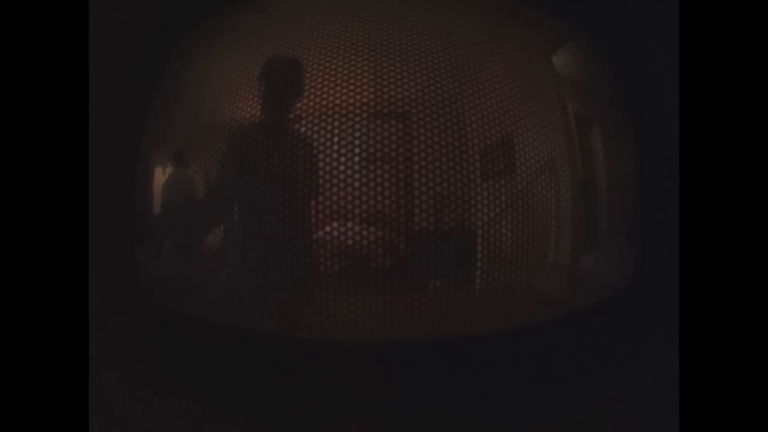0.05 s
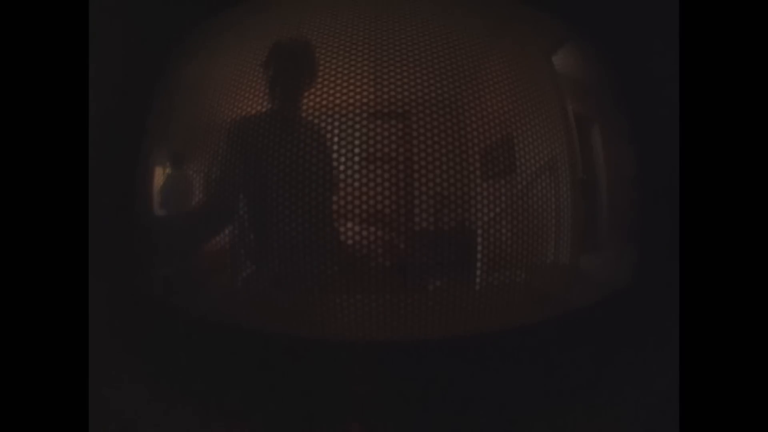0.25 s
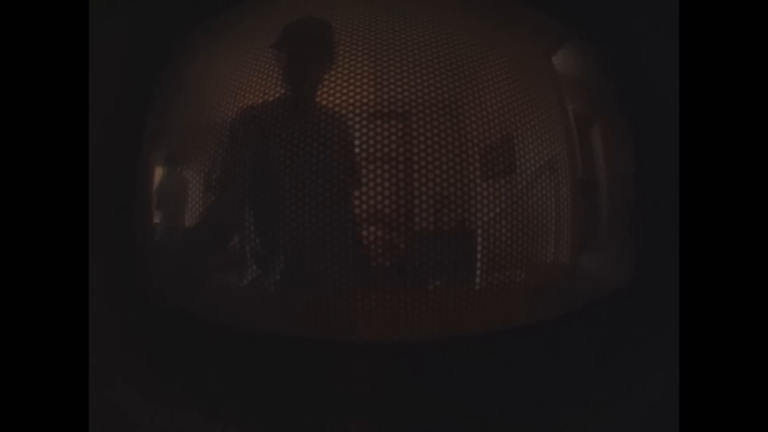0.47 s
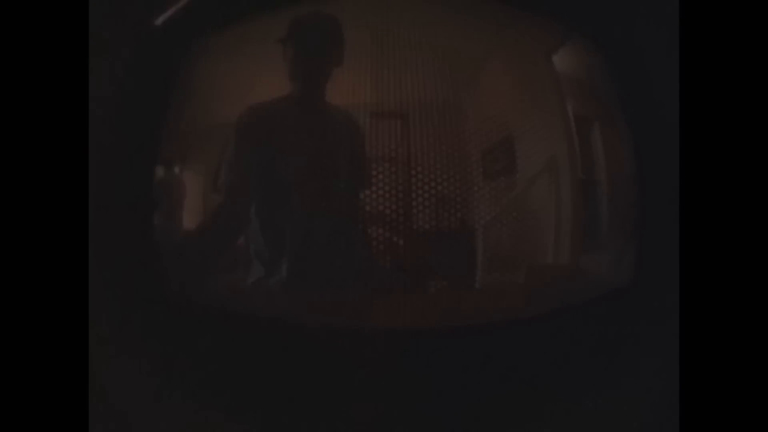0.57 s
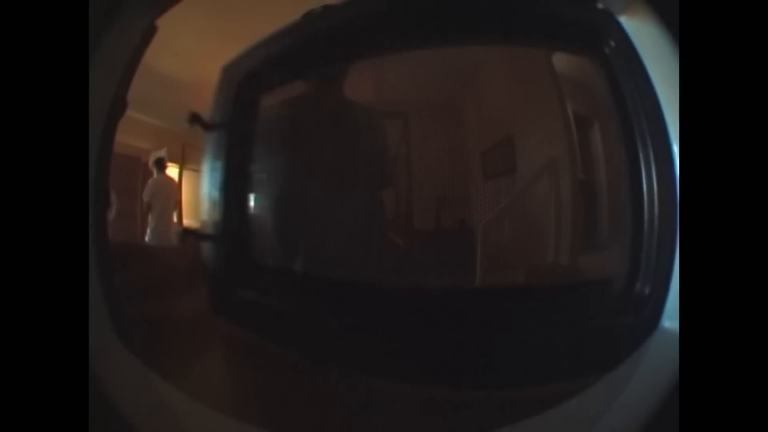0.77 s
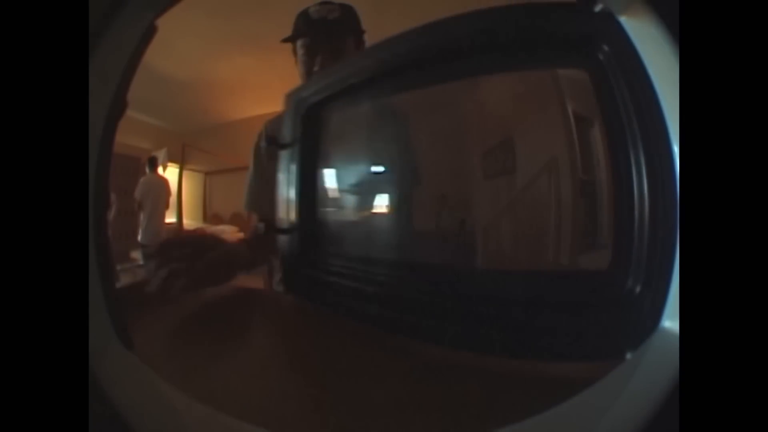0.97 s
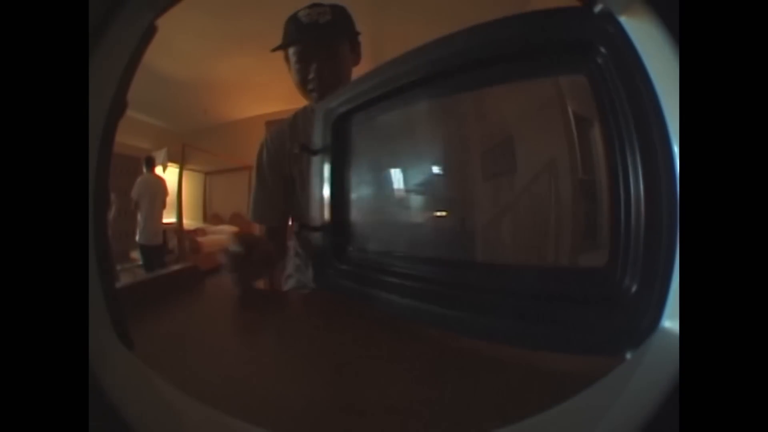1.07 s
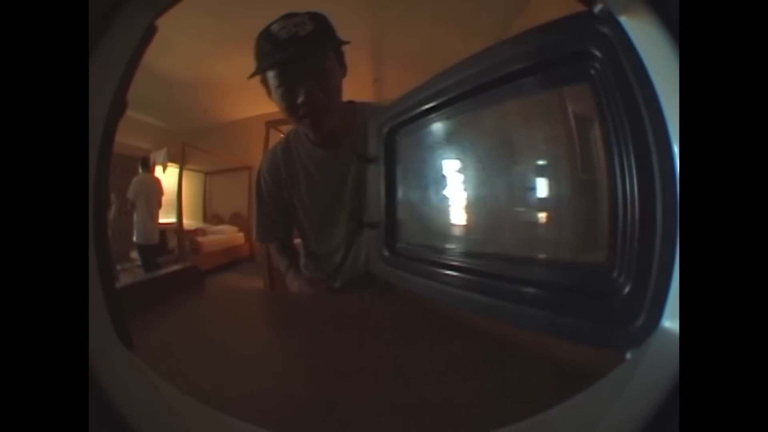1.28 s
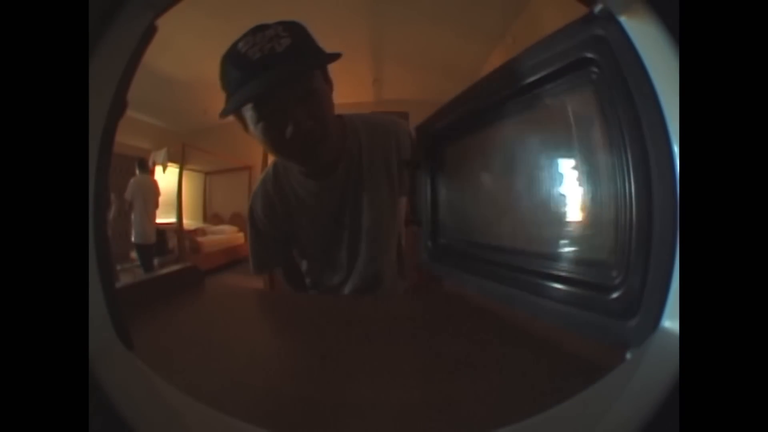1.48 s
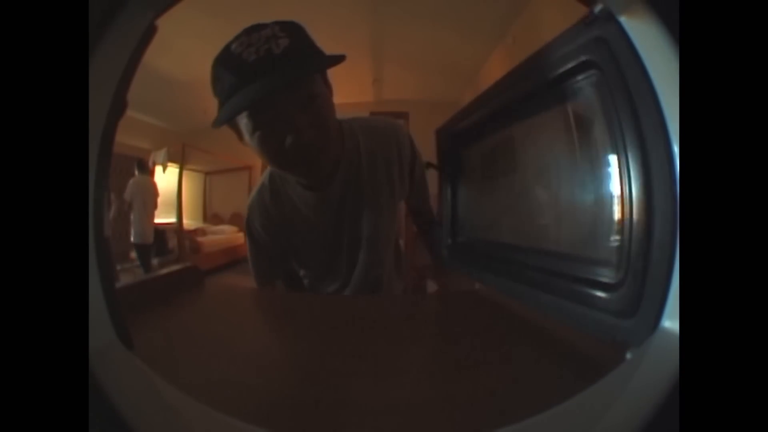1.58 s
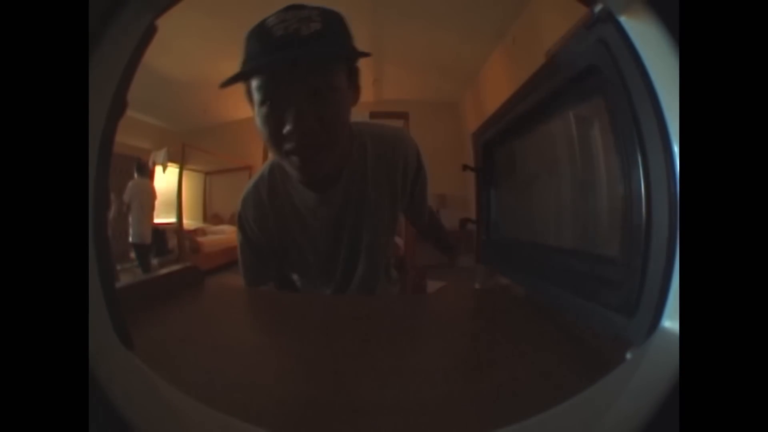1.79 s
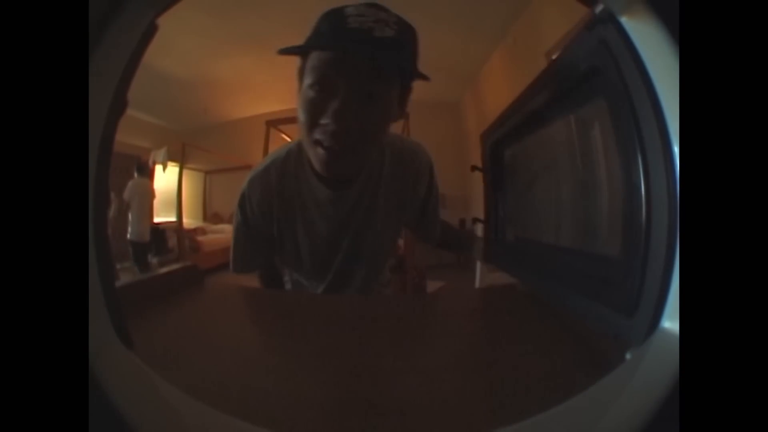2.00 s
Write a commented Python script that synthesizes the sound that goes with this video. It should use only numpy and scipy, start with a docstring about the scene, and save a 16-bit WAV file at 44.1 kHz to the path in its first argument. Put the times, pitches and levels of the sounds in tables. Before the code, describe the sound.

A microwave oven door opening, heard from inside the cavity: low mains hum, sharp latch clicks and metallic cracks, a boomy thump and shuddering rattle, then quiet room noise and a final hard knock at the stop.

```python
"""Microwave oven door opening

Heard by a camera inside the oven. Mains hum booms in the shut cavity; the latch is pushed and springs free
in noise-burst ticks and cracks. The door opens shuddering, thumps once and knocks on its stop: blows and noise
drive resonances of door, panels, cavity air and low boom, beside a drifting low tone. Sines make the hum, buzz
and camera-motor whine; shaped noise makes the room and fan. A limiter holds the peaks."""
import sys
import numpy as np
from scipy import signal
from scipy.fft import rfft, irfft, next_fast_len
from scipy.io import wavfile
from scipy.ndimage import uniform_filter1d, minimum_filter1d, map_coordinates

SR = 44100
rng = np.random.default_rng(int(sys.argv[2]) if len(sys.argv) > 2 else 0)


def wrap_up_sound(samples):
    """Save the sound to the file named by the first command line argument, as 16-bit audio."""
    columns = np.atleast_2d(samples).T
    # keep every value between -1 and 1, then stretch to whole-number steps
    tamed = np.clip(columns, -1, 1)
    steps = np.round(tamed * 32767).astype(np.int16)
    wavfile.write(sys.argv[1], SR, steps)


def how_loud(loudness_db):
    """Turn decibels into a plain amplitude multiplier (0 dB gives 1, 20 dB gives 10)."""
    steps = np.asarray(loudness_db, float) / 20
    return 10 ** steps


N = 90272
T = np.arange(N) / SR
OPENS_S, OPENING_S = 0.533, 0.0099
SETTLES_S, AT_STOP_S = 1.0, 1.8


def unit(x):
    """Scale to rms 1."""
    return x / np.sqrt(np.mean(x ** 2) + 1e-20)


def curves(rows):
    """One value per sample for each column after the time."""
    s, *columns = np.transpose(rows)
    return [np.interp(T, s, column) for column in columns]


def wobble(rate_hz):
    """Smooth random curve with rate_hz knots a second."""
    knots = rng.standard_normal(int(N * rate_hz / SR) + 4)
    return map_coordinates(knots, [T * rate_hz])


def unit_gain(h):
    """Scale a response to mean power gain 1."""
    return h / np.sqrt(np.mean(abs(h) ** 2))


def filtered(x, response):
    """Apply a response of frequency that passes white noise at unchanged power."""
    size = next_fast_len(len(x) + SR // 2)
    hz = np.fft.rfftfreq(size, 1 / SR) + 1e-3
    return irfft(rfft(x, size) * unit_gain(response(hz)), size)[:len(x)]


def rings(x, modes):
    """Drive parallel causal resonances of alternating sign."""
    def response(f):
        total = 0
        for k, (hz, width_hz, db) in enumerate(modes):
            damping = 1j * f * width_hz
            total = total + (-1) ** k * how_loud(db) * damping / (hz * hz - f * f + damping)
        return total
    return filtered(x, response)


def low(x, hz, kind="low"):
    """Causal third-order low- (or high-) pass."""
    return signal.sosfilt(signal.butter(3, min(hz, SR / 2.2), kind, fs=SR, output="sos"), x)


def grit(size):
    """Noise of many uneven small contacts: level redrawn every 16 samples."""
    uneven_db = 3.3 * np.repeat(rng.standard_normal(size // 16 + 1), 16)[:size]
    return unit(rng.standard_normal(size) * how_loud(uneven_db))


def add(track, s, sound):
    """Mix a sound in at time s."""
    at = track[round(s * SR):][:len(sound)]
    at += sound[:len(at)]


def opened():
    """Door position for the mix: 0 shut, 1 open."""
    return np.clip((T - OPENS_S) / OPENING_S, 0, 1)


def tone(hz, drift_rad):
    """Sine of rms 1 with wandering phase."""
    phase = rng.uniform(0, 2 * np.pi) + drift_rad * wobble(7.63)
    return np.sqrt(2) * np.sin(2 * np.pi * hz * T + phase)


def line(hz, shut_db, open_db, waver_db, waver_hz, drift_rad):
    """Wavering tone whose level shifts as the door opens."""
    level_db = shut_db + (open_db - shut_db) * opened() + waver_db * wobble(waver_hz)
    return how_loud(level_db) * tone(hz, drift_rad)


# knocks on the steel shell: start_s, drive_db, rattle_t60_s
SHELL_KNOCKS = [(0.254, -44.5, 1.2), (0.307, -21, 0.13), (0.3116, -10.5, 0.14), (0.328, -16, 0.26),
                (0.363, -12.5, 0.11), (.383, -22.5, 0.5), (0.4701, -9, 0.23), (.492, -10, 0.17),
                (.506, -9, 0.16), (.542, -14, 0.058), (.97, -39.5, 0.47), (1.047, -39, 0.17),
                (1.605, -44.5, 0.34), (1.8323, -7.5, 0.11), (1.853, -21, 0.28)]
STRIKE = 9.4  # first sample of each knock, against rattle of rms 1


def knocks():
    """Each knock is an impulse followed by decaying grit."""
    out, t = np.zeros(N), T[:SR // 2]
    for start_s, drive_db, t60_s in SHELL_KNOCKS:
        drive = grit(len(t)) * how_loud(-60 * t / t60_s)
        drive[0] = STRIKE
        add(out, start_s, how_loud(drive_db) * drive)
    return out


# soft blows that set the shell booming: start_s, relative_db, contact_s
SOFT_BLOWS = [(0.308, -14, 0.0039), (0.345, -17, 0.0021), (0.386, -21.5, 0.0031), (.428, -10, 0.0052),
              (0.461, -16.5, 0.0017), (0.542, 0.5, 0.0047), (.628, -23, 0.0044), (0.671, -12.5, 0.0027),
              (0.734, -20, 0.0025), (.9, -28, 0.0019), (1.068, -12, 0.005), (1.835, -6.5, 0.0014),
              (1.922, -15.5, 0.0021), (1.975, -22, 0.0035)]
THUMP_DB = 28


def thumps():
    """Each soft blow is a smooth push as long as its contact."""
    out = np.zeros(N)
    for start_s, relative_db, contact_s in SOFT_BLOWS:
        push = np.hanning(round(contact_s * SR) + 3)
        add(out, start_s, how_loud(relative_db + THUMP_DB) * push / push.sum())
    return out


# thin rings of the loose door: pitch_hz, relative_db
DOOR_RINGS = [(1109, -12), (1443, 4), (1680, 1), (1900, -4), (2525, -2.5)]
DOOR_WIDTH_HZ, DOOR_DB, SHUDDER_TOP_HZ = 7.9, -6.5, 2230


def loose_door(clang, shake):
    """Shudder and the knocks after opening excite narrow door modes."""
    drive = low(shake + clang * (T > OPENS_S), SHUDDER_TOP_HZ)
    return how_loud(DOOR_DB) * rings(drive, [(hz, DOOR_WIDTH_HZ, db) for hz, db in DOOR_RINGS])


# steel panel modes: pitch_hz, width_hz, relative_db
PANEL_MODES = [(594.6, 125, 1.5), (941, 25, -1.5), (1070, 158, -3.5), (1310, 88, 1.5), (1517, 102, 1),
               (1689, 157, 0), (1870, 93, 0.5), (2284, 135, -5), (2560, 186, 0), (3150, 2230, -10.5)]


def panels(drive):
    """Steel panels resonate in broad modes."""
    return rings(drive, PANEL_MODES)


# shut cavity air modes: pitch_hz, width_hz, relative_db
CAVITY_MODES = [(541, 36, -0.5), (609, 21, 4.5), (1423, 48, 0.5), (2524, 90, 3)]
CAVITY_DB = -6.5


def cavity_air(drive):
    """The same drive excites the enclosed air until the door opens."""
    return how_loud(CAVITY_DB) * (1 - opened()) * rings(drive, CAVITY_MODES)


# low boom modes, door shut: pitch_hz, width_hz, relative_db
SHUT_BOOM = [(88, 10.7, -0.5), (144, 17.3, -5.5), (240, 85, -12)]
# low boom modes, door open (pitch scaled by BOOM_SAG after SETTLES_S): pitch_hz, width_hz, relative_db
OPEN_BOOM = [(95.2, 5.8, -8), (159.7, 8.7, 0), (259, 29.6, -12.5), (298.5, 35, -17.5), (405, 136, -18.5)]
# low boom modes, door at its stop: pitch_hz, width_hz, relative_db
STOP_BOOM = [(111, 60, -9.5), (175.8, 19, 1), (247, 37, -11.5), (290, 14, -2), (390, 95, -16.5)]
BOOM_TOP_HZ, BOOM_FOOT_HZ, BOOM_SAG = 403, 64.4, .92


def low_boom(drive):
    """Low modes change with the door; they sit lower once the swing slows."""
    drive = low(low(drive, BOOM_TOP_HZ), BOOM_FOOT_HZ, "high")
    early = T < OPENS_S - OPENING_S
    swinging = ~early * (T < SETTLES_S)
    slowing = (T >= SETTLES_S) * (T < AT_STOP_S)
    sagged = [(BOOM_SAG * hz, width_hz, db) for hz, width_hz, db in OPEN_BOOM]
    out = (1 - opened()) * rings(drive * early, SHUT_BOOM)
    out = out + rings(drive * swinging, OPEN_BOOM)
    out = out + rings(drive * slowing, sagged)
    return out + rings(drive * (T >= AT_STOP_S), STOP_BOOM)


TONE_SWING_HZ, TONE_STOP_HZ, TONE_DB, TONE_DRIFT_RAD = 162.7, 176, -5.5, 1.5


def boom_tone(boom_db, lumps_db):
    """A steady, drifting low tone on the shudder's boom curve; silent between settling and the stop."""
    swinging = tone(TONE_SWING_HZ, TONE_DRIFT_RAD) * (T < SETTLES_S)
    stopped = tone(TONE_STOP_HZ, TONE_DRIFT_RAD)
    return how_loud(boom_db + TONE_DB + 2 * lumps_db) * np.where(T < AT_STOP_S, swinging, stopped)


# drive of the swinging door's shudder: time_s, clang_db, boom_db
DOOR_SHUDDER = [(.5, -64, -43), (.56, -27.5, -16), (.66, -20.5, -16.5), (.72, -25.5, -19), (.77, -26, -19),
                (.84, -31.5, -24.5), (.94, -41.5, -34), (1.1, -48, -26.5), (1.2, -75, -52),
                (1.83, -77, -74), (1.86, -24.5, -16.5), (1.92, -24, -14.5), (1.98, -29, -16.5),
                (2.04, -38, -19)]
LUMPY_DB, CLANG_TOP_HZ = 1.5, 3260
PUSH_TOP_HZ, PUSH_ENDS_S = 2200, .36  # the first, softer push on the latch is duller


def shell():
    """Blows and shudder drive the door, panels, cavity air and low boom; a low tone joins them."""
    clang = knocks()
    clang_db, boom_db = curves(DOOR_SHUDDER)
    lumps_db = LUMPY_DB * wobble(45.92)
    shake = low(how_loud(clang_db + lumps_db) * grit(N), 300, "high")
    rumble = how_loud(boom_db + lumps_db - 0.5) * rng.standard_normal(N)
    push = low(clang * (T < PUSH_ENDS_S), PUSH_TOP_HZ)
    later = low(clang * (T >= PUSH_ENDS_S), CLANG_TOP_HZ)
    drive = push + later + low(low(shake, SHUDDER_TOP_HZ), CLANG_TOP_HZ)
    body = loose_door(clang, shake) + panels(drive) + cavity_air(drive)
    return body + low_boom(thumps() + rumble) + boom_tone(boom_db, lumps_db)


# latch ticks and scrapes: start_s, level_db, rise_s, t60_s, tilt_db_per_octave
LATCH_TICKS = [(0.309, -30, 0.0017, 0.14, -8), (0.34, -14, 0.0012, 0.087, 2),
               (0.3611, -14, 0.0023, 0.1, -1), (.43, -32, 0.025, 0.25, -8),
               (0.4686, -13, 0.00028, 0.22, -10), (.492, -11.5, 0.0054, 0.1, -8),
               (0.508, -14.5, 0.00046, 0.098, -11.5), (0.5431, -8.5, 0.0013, 0.068, -11.5),
               (.548, -22, 0.0025, 0.24, -13), (.605, -34, 0.0026, 0.47, -11),
               (.641, -30.5, 0.003, 0.25, -10.5), (0.666, -36, 0.0028, 0.21, -11),
               (0.688, -39, .002, 0.066, 9), (0.73, -30, 0.0038, 0.085, -5),
               (1.062, -34.5, 0.0039, 0.1, -11.5), (1.609, -34.5, 0.0056, 0.23, -13),
               (1.836, -24.5, 0.00046, 0.073, -3.5), (1.941, -41.5, 0.0012, 0.12, -7),
               (1.974, -43.5, 0.0022, 0.064, -2)]


def latch():
    """Small plastic and spring contacts: short grit bursts with tilted treble."""
    out, t = np.zeros(N), T[:SR // 5]
    for start_s, level_db, rise_s, t60_s, tilt_db in LATCH_TICKS:
        def response(f):
            foot = f ** 2 / (f ** 2 + 3000 ** 2)
            return how_loud(tilt_db * np.log2(f / 8000)) * foot / (1 + (f / 14400) ** 40)
        burst = grit(len(t)) * how_loud(level_db - 60 * t / t60_s) * (1 - np.exp(-t / rise_s))
        add(out, start_s, filtered(burst, response))
    return out


# hard contacts: start_s, level_before_filters_db
HARD_CONTACTS = [(0.3398, -20), (.3648, -6), (0.4697, -5), (0.542, -14), (1.8332, -0.5), (1.8385, -20)]
CRACK_T60_S, CRACK_FOOT_HZ, CRACK_TOP_HZ = .005, 1100, 9500


def cracks():
    """Hard contacts: a few milliseconds of broadband snap from random signs."""
    out, t = np.zeros(N), T[:SR // 50]
    for start_s, level_db in HARD_CONTACTS:
        snap = np.sign(rng.standard_normal(len(t)))
        add(out, start_s, how_loud(level_db - 60 * t / CRACK_T60_S) * snap)
    return low(low(out, CRACK_FOOT_HZ, "high"), CRACK_TOP_HZ)


# clear rings, rising as the gap widens (t60 before the opening cut):
# start_s, pitch_hz, rise_hz_per_s, level_db, t60_s
CAVITY_RINGS = [(.316, 1044, 12, -19.5, 0.66), (0.339, 1044, 3, -19, 0.69), (0.362, 2560, 100, -18, 0.2),
                (.472, 1038, 6, -15, 1.3), (0.502, 590, 436, -12, 1.6), (.503, 2545, 300, -8, 0.095)]
RING_ATTACK_S, RING_CUT_DB_PER_S = 0.0027, 295


def cavity():
    """Clear air modes of the shut cavity, dying fast when the door opens."""
    out, t = np.zeros(N), T[:SR // 2]
    for start_s, hz, rise, level_db, t60_s in CAVITY_RINGS:
        envelope = how_loud(level_db - 60 * t / t60_s) * (1 - np.exp(-t / RING_ATTACK_S))
        cycles = hz * (start_s + t) + rise * t * t / 2
        add(out, start_s, envelope * np.sin(2 * np.pi * cycles))
    cut_db = RING_CUT_DB_PER_S * np.maximum(T - OPENS_S, 0)
    return out * how_loud(2.0 * wobble(29.5) - cut_db)


# mains levels: time_s, mains_db, octave_db
MAINS_LEVELS = [(.03, -20, -51), (.06, -31, -48), (.11, -22.5, -31), (.27, -24.5, -25.5), (.46, -17.5, -25),
                (.52, -39, -62), (.62, -33, -15.5), (.75, -25, -29.5), (1.1, -42, -43.5),
                (1.25, -43.5, -30), (1.52, -45, -41.5), (1.68, -50, -33.5), (2.04, -59, -37)]
# buzz lines: pitch_hz, shut_db, open_db
BUZZ_LINES = [(187.5, -53, -78), (236.8, -48.5, -70), (308.6, -81, -43), (550, -53.5, -93),
              (151.4, -64, -39.5)]
MAINS_HZ = 59.2


def hum():
    """Mains tone and its octave on drawn level curves, plus wavering buzz lines."""
    mains_db, octave_db = curves(MAINS_LEVELS)
    turn = 2 * np.pi * MAINS_HZ * T
    mains = how_loud(mains_db) * np.sin(turn - 1.5) + how_loud(octave_db) * np.sin(2 * turn + 0.9)
    buzz = sum(line(hz, shut_db, open_db, 0.63, 9.1, 0.22) for hz, shut_db, open_db in BUZZ_LINES)
    return np.sqrt(2) * mains + buzz


# camera motor lines: pitch_hz, shut_db, open_db
MOTOR_LINES = [(2099, -63, -59), (2697, -61, -58), (3295, -57, -57.5), (3898, -67, -68), (5949, -65, -68),
               (6142, -65, -74), (6551, -62, -70), (7494, -70, -78), (10191, -73, -73), (10788, -68, -74),
               (11687, -72, -76)]
WHINE_WAVER_DB = 1.0


def whine():
    """The camera's motor: wavering high lines, phase wandering more with pitch."""
    return sum(line(hz, shut_db, open_db, WHINE_WAVER_DB, 6.34, 0.077 + hz / 12000)
               for hz, shut_db, open_db in MOTOR_LINES)


# noise spectrum, door shut: frequency_hz, relative_density_db
SHUT_NOISE = [(88, -45), (150, -1.5), (366, -20), (572, -21.5), (766, -24.5), (1200, -25.5), (3350, -33),
              (4560, -35.5), (6200, -30.5), (8300, -38.5), (10600, -38), (13500, -42), (15500, -62)]
# noise spectrum, door open: frequency_hz, relative_density_db
OPEN_NOISE = [(35, -24), (60, -22), (135, 5.5), (236, -10.5), (500, -12), (792, -18.5), (1600, -18.5),
              (2250, -26.5), (4520, -31.5), (6200, -31.5), (8300, -40.5), (10500, -37.5), (13500, -43),
              (15500, -68)]
AIR_SHUT_DB, AIR_OPEN_DB = -42.5, -37.5


def air():
    """Room and fan noise, fuller once the door is open."""
    def noise(points):
        hz, db = np.transpose(points)
        return filtered(rng.standard_normal(N), lambda f: how_loud(np.interp(np.log(f), np.log(hz), db)))
    shut = how_loud(AIR_SHUT_DB) * (1 - opened()) * noise(SHUT_NOISE)
    return shut + how_loud(AIR_OPEN_DB) * opened() * noise(OPEN_NOISE)


FADE_S, FADE_IN_S, FADE_OUT_S = .032, .028, .012


def scene():
    """All sources, faded in after a short silence and faded out."""
    fade_in = np.clip((T - FADE_S) / FADE_IN_S, 0, 1) ** 2
    fade_out = np.clip((T[-1] - T) / FADE_OUT_S, 0, 1)
    mix = shell() + latch() + cracks() + cavity() + hum() + whine() + air()
    return (fade_in * fade_out * mix)[None]


def low_pass(x):
    """Removes everything above the highest recorded frequency."""
    return signal.sosfilt(signal.butter(12, 16510, fs=SR, output="sos"), x)


CEILING_DB, LOOK_S, HOLD_S, TOP_HZ = -2.2, 0.0044, 0.0011, 15200


def record(dry):
    """The camera's fast limiter, its gain dipping smoothly around peaks, then a band limit."""
    need = np.minimum(1, how_loud(CEILING_DB) / (abs(dry) + 1e-9))
    look, hold = round(LOOK_S * SR), round(HOLD_S * SR)
    gain = uniform_filter1d(minimum_filter1d(need, look + hold, axis=1), look, axis=1)
    band_limit = signal.butter(10, TOP_HZ, fs=SR, output="sos")
    return low_pass(signal.sosfilt(band_limit, dry * gain))


dry = scene()
out = record(dry)
wrap_up_sound(out)
```